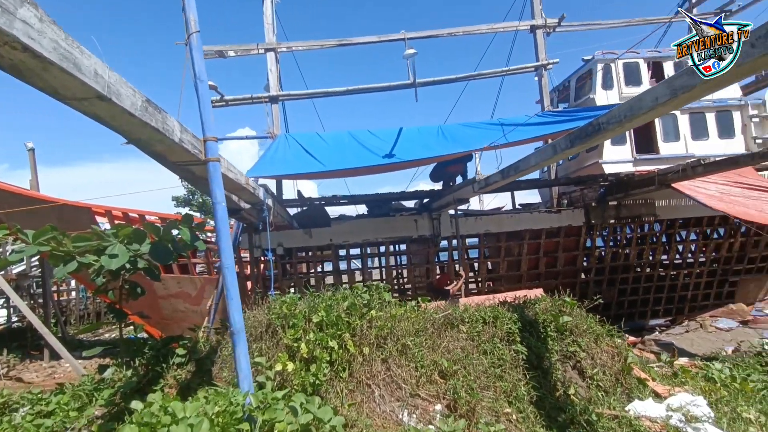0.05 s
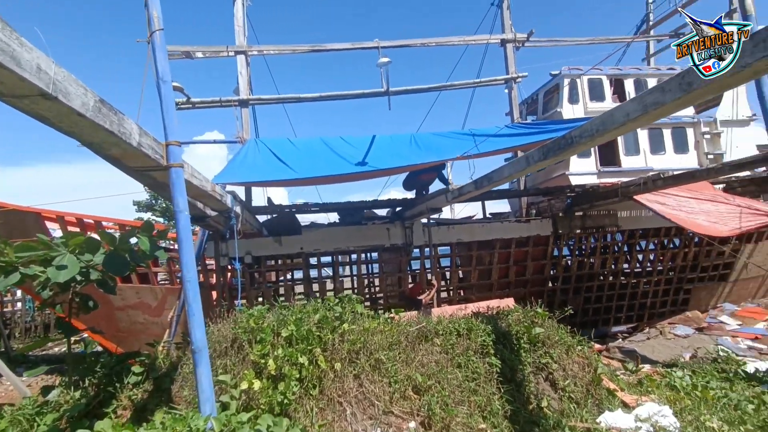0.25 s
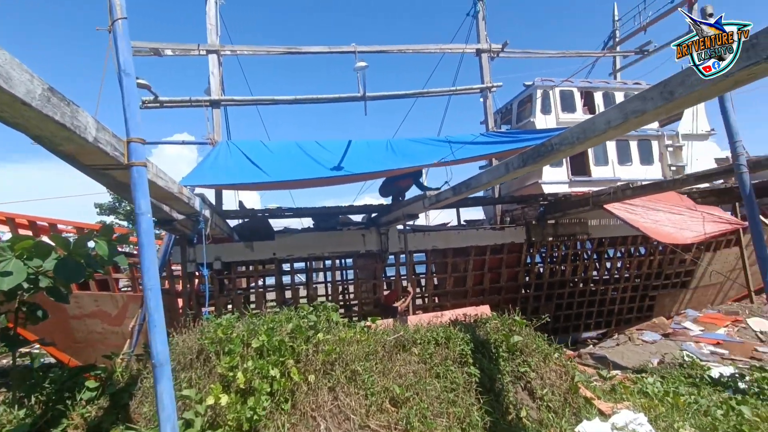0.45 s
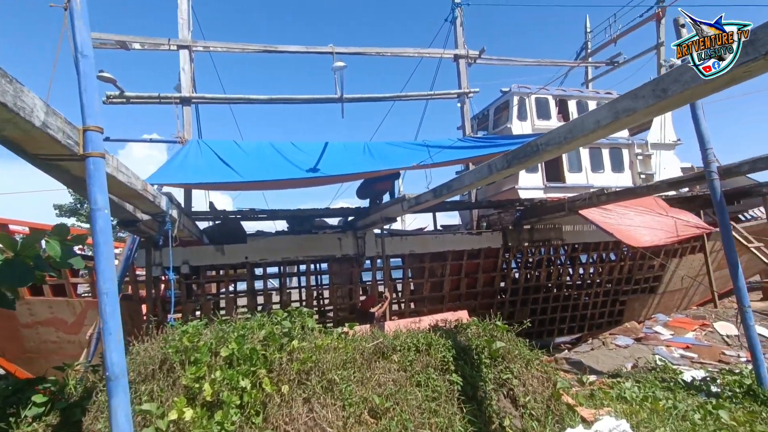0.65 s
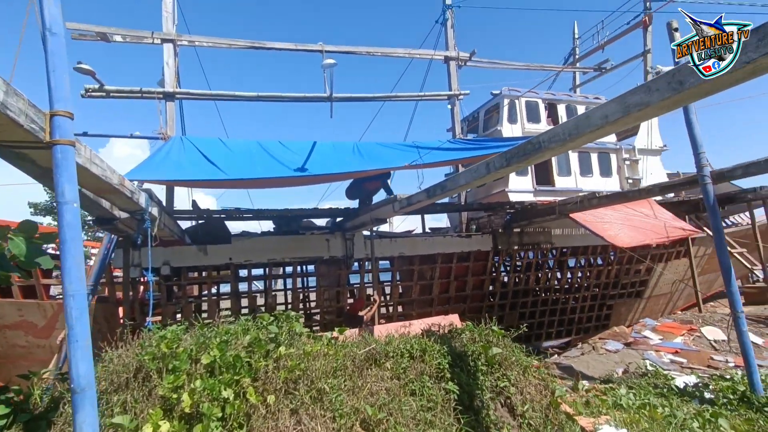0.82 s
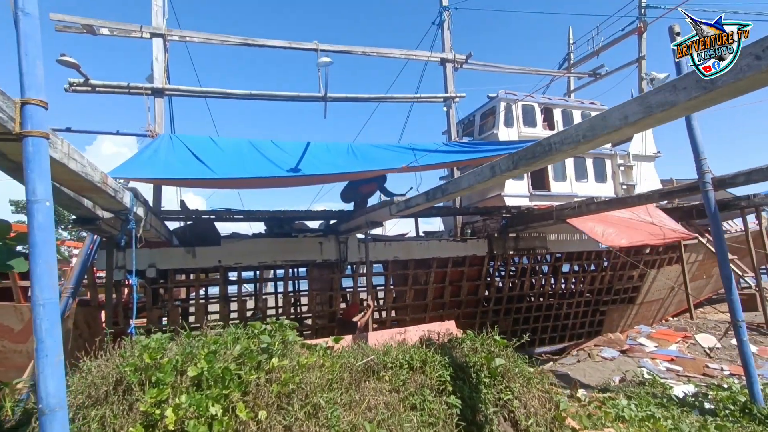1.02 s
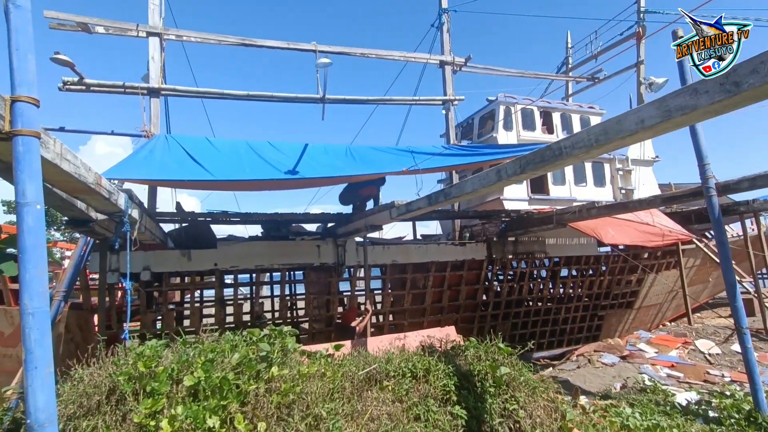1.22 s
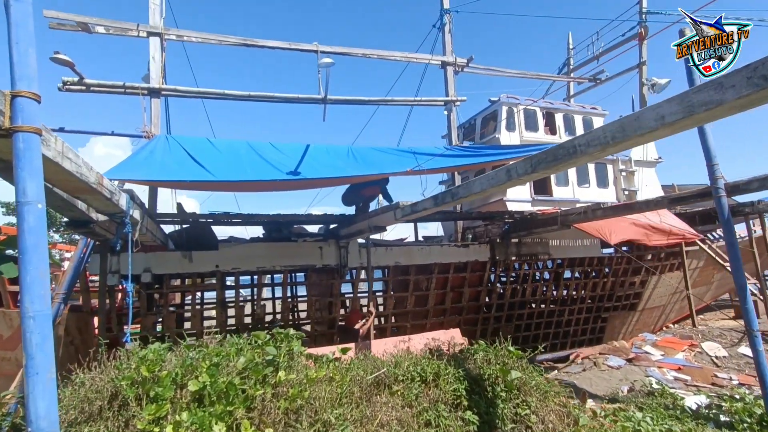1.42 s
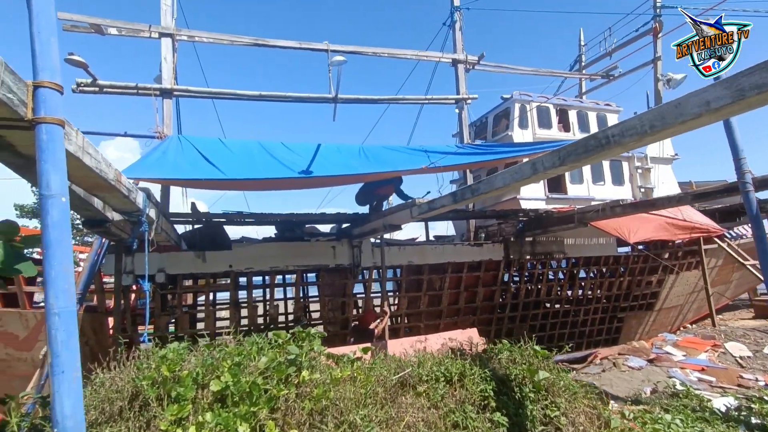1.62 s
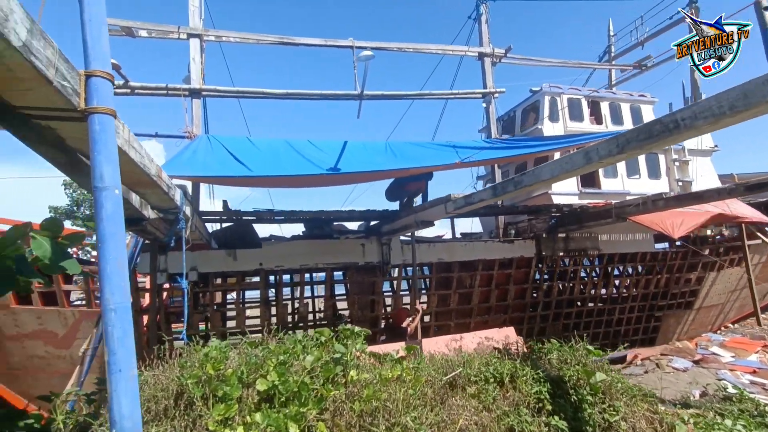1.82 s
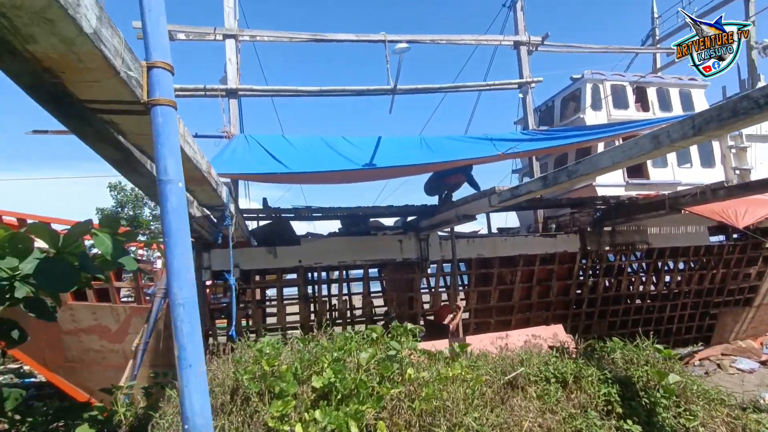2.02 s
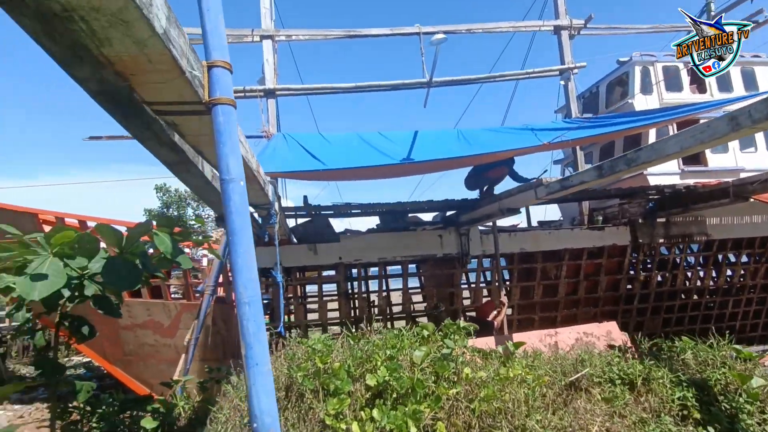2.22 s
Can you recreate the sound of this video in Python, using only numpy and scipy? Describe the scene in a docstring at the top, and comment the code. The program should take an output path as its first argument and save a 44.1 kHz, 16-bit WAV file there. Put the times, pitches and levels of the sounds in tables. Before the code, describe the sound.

A hammer strikes a wooden boat four times, at about 0.2, 0.8, 1.4 and 2.0 seconds. Each blow is a short thump and bright crack, with a brief clattering echo across the open yard. Faint distant knocks come around 0.5 and 2.3 seconds. Near 1.8 seconds a foot brushes through dry grass close to the microphone, snapping a few stalks. A soft outdoor hush continues throughout.

```python
"""An open boatyard in stereo, with dry grass rustling close to the microphone over a steady hush.
A worker hammers four times on a wooden boat: each blow is a short thump of the planking, a bright
crack just after it, then a clatter of reflections from the hull and sheds.
Faint knocks come from far across the yard. Just before the last blow a foot brushes through the
grass nearby and snaps a few stalks; one more far knock follows."""
import sys
import numpy as np
from scipy import signal
from scipy.fft import rfft, irfft
from scipy.io import wavfile
from scipy.ndimage import uniform_filter1d

SR = 44100
rng = np.random.default_rng(int(sys.argv[2]) if len(sys.argv) > 2 else 0)


def master_out(mix):
    """Clip the mix to full scale and print it as 16-bit PCM to the path in sys.argv[1]."""
    frames = np.transpose(np.atleast_2d(mix))
    ceiling = np.clip(frames, -1, 1)
    pcm = np.round(ceiling * 32767).astype(np.int16)
    wavfile.write(sys.argv[1], SR, pcm)


N = 103635

# Left-right balance by frequency, including the right microphone's ring near 2.3 kHz:
# frequency_hz, left_minus_right_db
BOAT_BALANCE = [(100, -1), (400, -2), (900, -2.5), (1400, -2.5), (2300, -14.5), (3200, -1.5), (4500, -5.5),
                (6500, -1), (8200, -4.5), (11000, 4.5), (15000, 1)]
GRASS_BALANCE = [(100, 15), (400, 0.5), (1300, -7.5), (2400, -14.5), (4400, -1), (8000, -2.5), (15000, 2.5)]


def hammer():
    """Four blows on the boat: the planking thumps and cracks, and the yard throws the sound back."""
    # Hammer blows: start_s, thump_db, pitch_hz, crack_delay_s, crack_db (before doubling), clatter_db
    blows = [(0.2232, -3.5, 424, 0.0087, -18, -21.5), (0.8050, -4.5, 421, 0.0076, -20.5, -22),
             (1.3850, -5.5, 419, .0075, -19, -22), (1.9734, -7, 465, 0.0069, -16, -21)]
    # Spectrum of the crack: frequency_hz, level_db
    crack_spectrum = [(100, -33), (300, -4), (600, 9), (1000, -2.5), (1450, 6.5), (1800, -4), (2200, 7.5),
                      (3000, -9.5), (5500, -12.5), (7200, -11), (8200, 3), (10000, -10.5), (12500, -13),
                      (15500, -8)]
    out = np.zeros((2, N))
    common_noise = rng.standard_normal((2, SR))  # the part of the reflections alike in every blow
    for start_s, thump_db, pitch_hz, crack_delay_s, crack_db, clatter_db in blows:
        add(out, start_s, amp(thump_db) * plank_thump(pitch_hz, peak_s=0.0017))
        crack = 2 * burst(crack_spectrum, BOAT_BALANCE, rise_s=0.001, t60_s=0.05)
        add(out, start_s + crack_delay_s, amp(crack_db) * crack)
        add(out, start_s + 0.005, amp(clatter_db) * clatter(common_noise))
    return out


def plank_thump(pitch_hz, peak_s, left_delay_s=0.00028):
    """Struck wood makes a heavily damped swing and rings briefly; the right channel hears it first."""
    # Modes of the planking: frequency_hz, level_db (against the swing), t60_s
    modes = [(263, -10.5, 0.042), (597, -18, 0.032), (1278, -7, 0.026), (1600, -23.5, 0.021),
             (2230, -17, 0.031), (3930, -23.5, 0.016), (8100, -26.5, 0.017)]
    t = np.maximum(np.arange(SR // 10) / SR - np.array([[left_delay_s], [0]]), 0)
    envelope = (t / peak_s * np.exp(1 - t / peak_s)) ** 2.05
    swing = envelope * np.sin(2 * np.pi * pitch_hz * t)
    ring = sum(amp(db) * decay(t, t60_s) * np.sin(2 * np.pi * hz * rng.uniform(0.94, 1.03) * t)
               for hz, db, t60_s in modes)
    return -(swing + ring)


def clatter(common_noise, common_share=0.63):
    """A dense clatter, held nearly level briefly as by a limiter, then dying away band by band."""
    # Spectrum of the reflections: frequency_hz, level_db
    spectrum = [(40, -23), (85, -17), (125, 0.5), (165, -7.5), (240, 1.5), (420, -2), (700, -4.5),
                (1000, -9), (1500, -1.5), (1850, -2.5), (2400, -4), (2800, -13), (4400, -10.5), (5200, -19),
                (7300, -14.5), (8000, -8), (10000, -11.5), (12500, -17.5), (15500, -20)]
    # Hull resonances that colour them: centre_hz, width_hz, gain_db
    hull_resonances = [(260, 25, -0.5), (436, 54, 6.5), (826, 35, 4), (1333, 74, 9), (1680, 34, -5.5),
                       (2190, 66, 11), (2340, 68, 5), (3903, 34, 7), (7840, 170, 3.5), (9030, 80, 2.5)]
    # Decay of the near reflections in the yard: frequency_hz, t60_s
    yard_decay = [(100, 0.44), (400, .23), (1300, 0.16), (2300, 0.2), (4500, 0.35), (9000, 0.33),
                  (15000, 0.32)]
    rise_s, plateau_s, sag_db, echo_db = 0.0029, 0.064, 3, -14
    fresh_noise = rng.standard_normal(common_noise.shape)
    noise = np.sqrt(common_share) * common_noise + np.sqrt(1 - common_share) * fresh_noise
    reflections = colour(noise, spectrum, BOAT_BALANCE, hull_resonances)
    hz, t, bands = signal.stft(reflections, SR, nperseg=256)
    after_plateau_s = np.maximum(t - plateau_s, 0)
    sag = amp(-sag_db * np.minimum(t / plateau_s, 1))
    near = sag * decay(after_plateau_s, at_hz(yard_decay, hz)[:, None])
    far = amp(echo_db) * decay(after_plateau_s, t60_s=0.7)
    tail = signal.istft(bands * np.hypot(near, far), SR, nperseg=256)[1]
    return tail * np.minimum(np.arange(tail.shape[1]) / SR / rise_s, 1)


def grass():
    """Dry grass close to the microphone: one footstep, a faint rustle and a few snapping stalks."""
    # Swell of the footstep and of the rustle: time_s, level_db
    step_levels = [(1.74, -80), (1.78, -46.5), (1.825, -35.5), (1.85, -24.5), (1.872, -23.5),
                   (1.895, -27.5), (1.925, -39.5), (1.965, -44), (2.03, -61)]
    rustle_levels = [(0, -47), (.1, -44), (.19, -59), (.45, -58.5), (.65, -53.5), (.95, -42.5), (1.15, -61),
                     (1.7, -57), (2.35, -62)]
    # Spectra of the footstep and of the dry stalks: frequency_hz, level_db
    step_spectrum = [(59, -39), (100, -3), (156, -17), (233, -33), (326, -17.5), (712, -8), (1400, -14),
                     (2220, 1), (2750, -6), (4370, -3), (5630, -21.5), (8060, -2), (15500, -10)]
    stalk_spectrum = [(200, -16.5), (1000, -6.5), (2300, -4), (4000, -4.5), (6000, -14), (7300, -12),
                      (8500, 3), (11000, -5.5), (15500, -3.5)]
    # Stalks snapping: start_s, level_db (before doubling), t60_s, left_minus_right_db
    snaps = [(0.5078, -40, 0.0073, -2), (1.0348, -33, 0.02, 10), (1.759, -41.5, .022, 3.5),
             (1.7915, -35, .006, 10), (1.8098, -28, 0.008, 0), (1.8161, -21, 0.0058, 9),
             (1.8451, -24.5, 0.016, 3), (1.8615, -39, .006, -2), (1.915, -24.5, .01, 6)]
    out = fader(step_levels) * rubbing_blades(step_spectrum, clicks_per_s=5700)
    out += fader(rustle_levels) * rubbing_blades(stalk_spectrum, clicks_per_s=1500)
    for start_s, level_db, t60_s, balance_db in snaps:
        snap = 2 * burst(stalk_spectrum, GRASS_BALANCE, rise_s=0.0002, t60_s=t60_s)
        add(out, start_s, amp(level_db) * pan(balance_db) * snap)
    return out


def rubbing_blades(spectrum, clicks_per_s, spread_db=0.5):
    """Blades of grass rub together in many tiny clicks of uneven size."""
    sizes = amp(spread_db * np.minimum(rng.exponential(1, N), 4))
    clicks = sizes * (rng.random(N) < clicks_per_s / SR)
    return colour(clicks * rng.standard_normal((2, N)), spectrum, GRASS_BALANCE)


def far_knocks():
    """Small knocks on wood, far from the microphone."""
    # Distant knocks: start_s, level_db, pitch_hz
    knocks = [(0.482, -36.5, 428), (0.5065, -49, 620), (0.688, -47, 394), (2.259, -36.5, 526)]
    out = np.zeros((2, N))
    for start_s, level_db, pitch_hz in knocks:
        add(out, start_s, amp(level_db) * plank_thump(pitch_hz, peak_s=0.0021))
    return out


def hush(waver_db=1.5):
    """The open air of the yard: soft noise whose level wavers a little."""
    # Spectrum of the hush: frequency_hz, level_db
    spectrum = [(20, -28), (45, -19), (85, 5.5), (150, 0.5), (260, -1.5), (420, 0.5), (700, -1.5),
                (1100, -4.5), (1700, -7), (2280, 0), (2900, -10.5), (4200, -5), (5500, -17), (7200, -13),
                (8100, -7), (11000, -15), (15500, -19)]
    # Balance, including the right microphone's ring near 2.3 kHz: frequency_hz, left_minus_right_db
    balance = [(60, 5), (110, 0), (200, 0.5), (380, -0.5), (700, 2), (1290, -2.5), (2380, -7), (4400, -1),
               (8120, 3.5), (15000, 18)]
    # Slow drift of the hush: time_s, level_db
    levels = [(0, -48), (.2, -51), (.65, -47.5), (1.0, -50.5), (1.25, -52), (1.7, -50.5), (2.35, -51)]
    waver = unit_rms(uniform_filter1d(uniform_filter1d(rng.standard_normal(N), size=1500), size=1000))
    air = colour(rng.standard_normal((2, N)), spectrum, balance)
    return air * fader(levels) * amp(waver_db * waver)


def burst(spectrum, balance, rise_s, t60_s):
    """A sharp burst of coloured noise, for a crack or a snap."""
    t = np.arange(SR // 8) / SR
    noise = colour(rng.standard_normal((2, len(t))), spectrum, balance)
    return noise * np.minimum(t / rise_s, 1) * decay(t, t60_s)


def colour(noise, spectrum, balance, resonances=()):
    """Shapes two unrelated noises into a stereo pair at rms 1, alike in the bass, wide in the treble."""
    # Likeness of the two channels: frequency_hz, coherence
    likeness = [(60, .9), (300, 0.9), (640, 0.65), (1400, 0.11), (3000, .05), (15000, .05)]
    hz = np.fft.rfftfreq(noise.shape[1], 1 / SR)
    left, right = rfft(noise)
    coherence = at_hz(likeness, hz)
    left = coherence * right + np.sqrt(1 - coherence ** 2) * left
    peaks_db = sum(db / (1 + (2 * (hz - centre) / width) ** 2) for centre, width, db in resonances)
    gains = amp(at_hz(spectrum, hz) + peaks_db) * pan(at_hz(balance, hz))
    return unit_rms(irfft(np.array([left, right]) * gains, noise.shape[1]))


def amp(db):
    """Decibels to gain."""
    return 10 ** (np.asarray(db) / 20)


def decay(t, t60_s):
    """Exponential fall of 60 dB in t60_s."""
    return np.exp(-np.log(1000) * t / t60_s)


def unit_rms(x):
    """Scales to rms 1."""
    return x / np.sqrt(np.mean(x ** 2) + 1e-20)


def at_hz(points, hz):
    """Reads a table on a log-frequency axis."""
    frequencies, values = np.transpose(points)
    return np.interp(np.log(hz + 1), np.log(frequencies + 1), values)


def fader(points):
    """Gain over the whole scene from points of time_s, level_db."""
    return amp(np.interp(np.arange(N) / SR, *np.transpose(points)))


def pan(balance_db):
    """Left and right gains of constant power for a left-minus-right level."""
    half_db = np.atleast_1d(balance_db) / 2
    gains = amp([half_db, -half_db])
    return gains / np.sqrt((gains ** 2).mean(0))


def add(mix, start_s, sound):
    """Mixes a stereo sound in at start_s."""
    part = mix[:, round(start_s * SR):][:, :sound.shape[1]]
    part += sound[:, :part.shape[1]]


def scene():
    """The boatyard."""
    return hammer() + far_knocks() + grass() + hush()


def record(dry):
    """The recorder overloads softly on the peaks and cuts the highest treble."""
    ceiling, cutoff_hz = 0.75, 15800
    softened = dry / (1 + (dry / ceiling) ** 4) ** (1 / 4)
    lowpass = signal.firwin(401, cutoff_hz, window=("kaiser", 8), fs=SR)
    return signal.oaconvolve(softened, lowpass[None], "same")


dry = scene()
out = record(dry)
master_out(out)
```